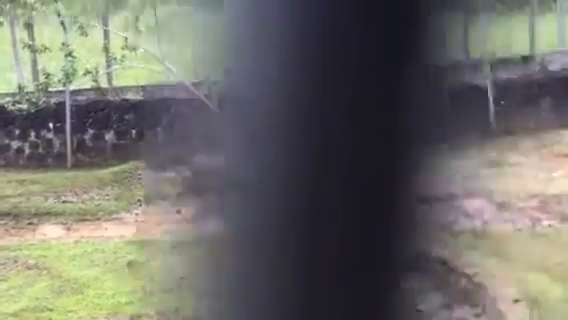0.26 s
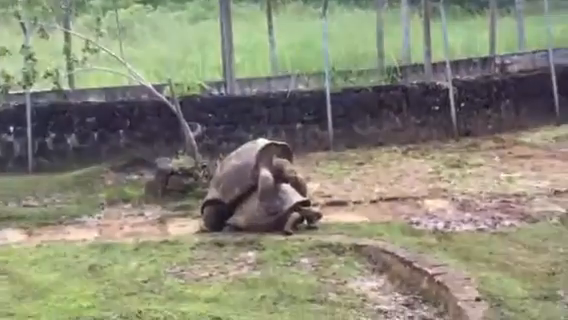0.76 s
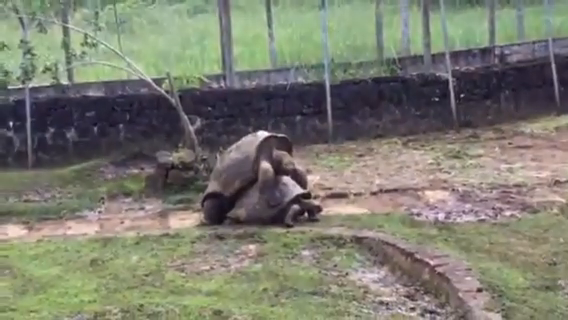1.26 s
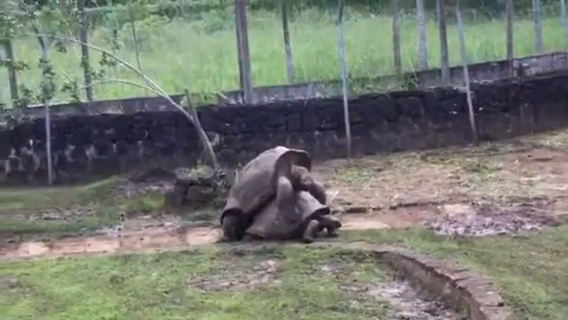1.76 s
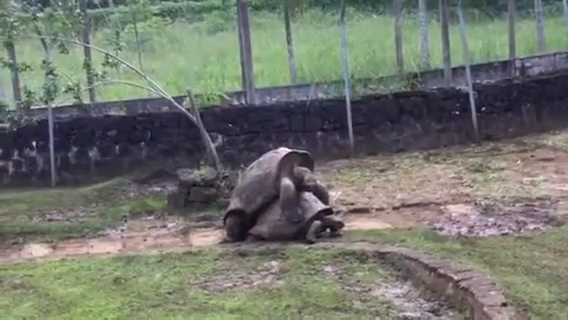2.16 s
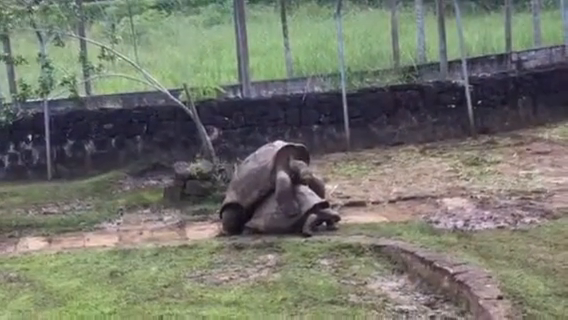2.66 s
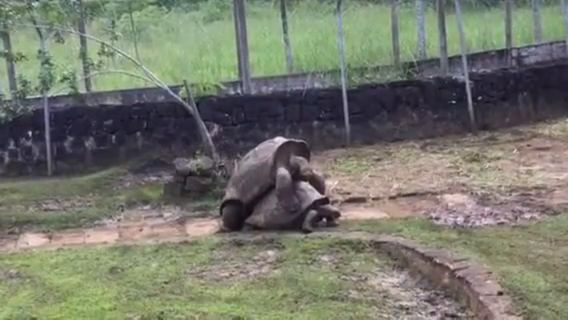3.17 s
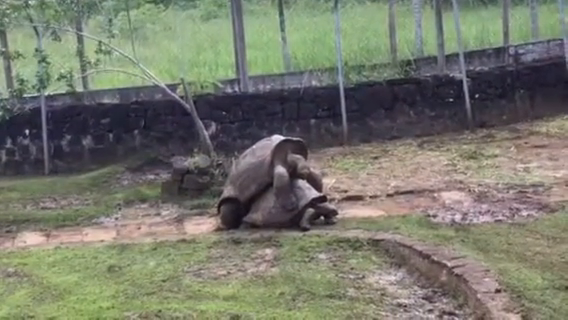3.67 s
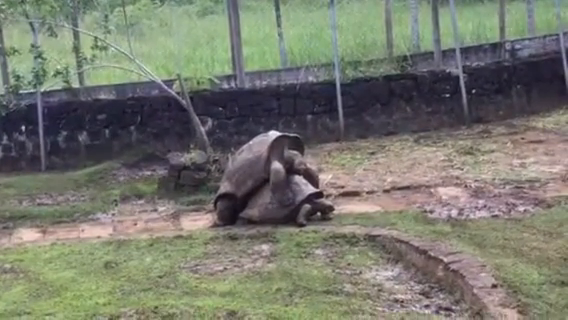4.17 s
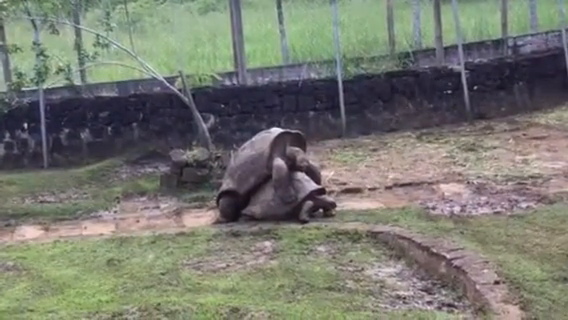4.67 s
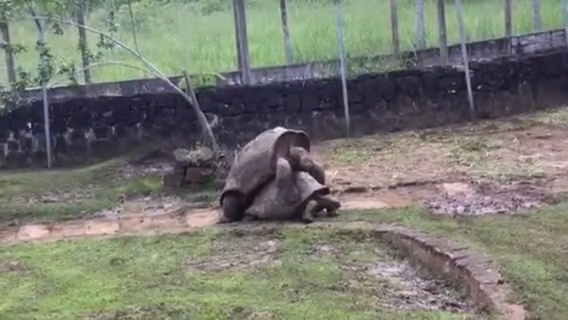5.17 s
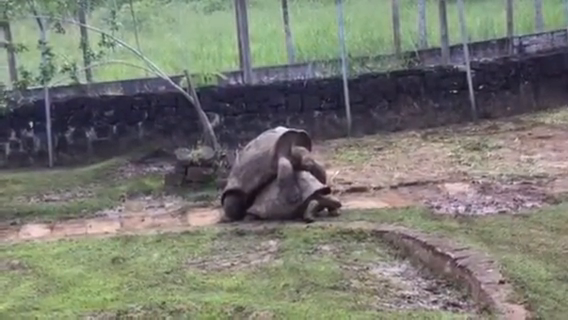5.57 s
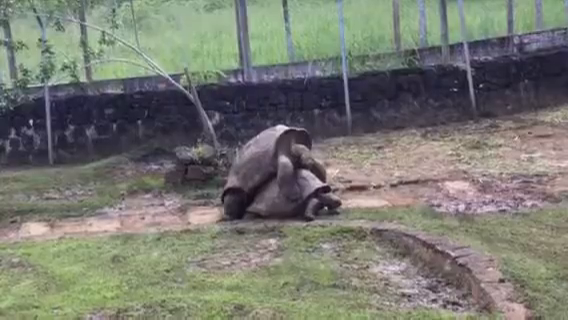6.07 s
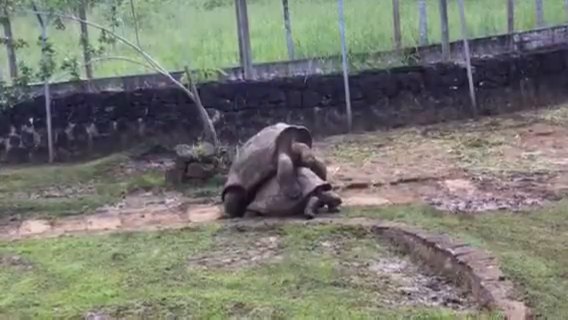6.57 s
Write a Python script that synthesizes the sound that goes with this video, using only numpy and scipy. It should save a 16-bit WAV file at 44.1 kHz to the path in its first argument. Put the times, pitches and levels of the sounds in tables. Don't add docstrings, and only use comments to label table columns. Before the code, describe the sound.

Quiet outdoor ambience with a distant low engine hum emerging from behind cover. Very early, the recorder is bumped, and a metal post is struck and dragged against. Then come sharp near bird calls, soft echoing warbles, rough chatter and thin insect hiss; a cicada's buzz stops partway. Light casing clicks cluster after two seconds, a strong one comes near five, and clear song closes the scene.

```python
import sys
import numpy as np
from scipy import signal
from scipy.fft import rfft, irfft
from scipy.io import wavfile

SR = 44100
rng = np.random.default_rng(int(sys.argv[2]) if len(sys.argv) > 2 else 0)


def ratio(d):
    e = np.asarray(d, float) / 20
    return 10 ** e


def wav_out(sig):
    wavfile.write(sys.argv[1], SR, np.round(np.clip(np.atleast_2d(sig).T, -1, 1) * 32767).astype(np.int16))


N = 300756

# f/Hz, level/dB
AIR_COLOUR = [(18, -39), (30, -27), (77, -1.5), (103, -6), (120, -3.5), (152, -12.5), (244, -22.5),
              (335, -24), (471, -78), (1090, -27.5), (1490, -41), (2730, -39.5), (4150, -44.5), (7200, -35),
              (15800, -55.5)]
# f/Hz, width/Hz, level/dB
INSECT_BANDS = [(6884, 930, 1.5), (7450, 600, -3.5), (8100, 840, -8.5), (5600, 1350, -8.5)]
# t/s, level/dB
INSECT_EFFORT = [(0, -64), (1.5, -60.5), (2.53, -60.5), (2.9, -75.5), (3.4, -68), (4.2, -65), (4.7, -69.5),
                 (5.15, -64), (5.5, -71), (6.82, -62.5)]
# t/s, lift/dB, half length/s
RUSTLES = [
    (2.5, 12, 0.3),
    (4.2, 9, .5),
    (5.15, 7, 0.34),
]
# t/s, level/dB, clicks/Hz
CICADA_EFFORT = [(0, -64, 162.5), (.8, -66.5, 164), (1.8, -62, 166), (2.5, -64, 169), (2.62, -75, 169.5),
                 (3.0, -76, 169), (6.82, -95, 169)]
# f/Hz, width/Hz, level/dB
CICADA_BODY = [(6550, 430, 0), (6970, 490, -1.5), (5330, 380, -10), (10470, 500, -17)]
# t/s, level/dB
FLOCK_EFFORT = [(0, -56.5), (.3, -76.5), (.9, -69.5), (2.6, -77), (2.85, -71), (3.5, -71), (4.2, -74.5),
                (5.9, -71), (6.82, -69.5)]
# start t/s, length/s, f/Hz, level/dB
HELD_NOTES = [(0, 0.19, 3046, -73), (.96, .05, 3140, -77), (1.53, 0.028, 2490, -68), (2.8, 0.08, 2655, -69),
              (3.129, 0.071, 3223, -69.5), (3.56, 0.038, 2860, -68), (3.612, 0.065, 2150, -69),
              (5.08, 0.03, 1725, -69.5), (5.293, 0.042, 2840, -74), (5.62, 0.07, 2690, -73),
              (5.623, 0.059, 1748, -75), (5.93, 0.071, 2707, -66.5), (6.028, 0.075, 2660, -67),
              (6.048, 0.058, 3410, -72), (6.164, 0.014, 2700, -59.5), (6.732, .08, 1756, -75)]
# start t/s, length/s, from f/Hz, to f/Hz, level/dB
BENT_NOTES = [(.82, 0.15, 3710, 3200, -70), (1.06, 0.088, 2850, 2380, -70), (2.33, 0.054, 2780, 2350, -71),
              (2.855, 0.045, 3410, 3040, -56.5), (2.89, 0.046, 2840, 2465, -59.5),
              (2.9, .06, 3120, 3370, -69), (3.3, 0.061, 4120, 3820, -67.5), (3.37, 0.03, 2670, 2070, -72),
              (3.535, 0.067, 2340, 2035, -69), (4.02, 0.057, 2360, 2100, -68),
              (5.24, 0.082, 2050, 2450, -67), (5.45, 0.1, 2990, 2725, -66), (5.7, 0.091, 2160, 2340, -67.5),
              (5.77, 0.026, 4050, 4100, -79)]
# start t/s, length/s, from f/Hz, to f/Hz, level/dB
SLIDES = [(2.695, 0.11, 2620, 2735, -63), (3.04, 0.033, 2650, 2400, -69), (4.83, 0.21, 5800, 2930, -75.5),
          (4.89, 0.059, 4310, 4010, -71), (5.0, 0.056, 5000, 3750, -71), (5.64, 0.056, 3900, 3540, -72.5),
          (6.14, 0.1, 2105, 2430, -72), (6.35, 0.055, 3800, 3450, -70), (6.385, 0.058, 2960, 2717, -69),
          (6.48, 0.14, 3100, 2670, -74), (1.285, 0.033, 5850, 4700, -63.5), (5.86, 0.077, 6620, 6530, -67)]
# start t/s, length/s, from f/Hz, to f/Hz, level/dB
CHIRPS = [(.745, 0.049, 6150, 6040, -70), (.803, 0.068, 5920, 4380, -61), (2.675, .075, 4600, 5750, -63),
          (2.745, .045, 5750, 4600, -68), (3.115, 0.033, 5500, 4400, -76), (3.255, .03, 6000, 5950, -74),
          (2.87, 0.033, 5400, 5380, -71), (3.72, 0.052, 4700, 4940, -73), (3.812, 0.1, 6170, 4660, -63.5),
          (4.64, 0.035, 5990, 6000, -67), (5.01, 0.028, 6270, 6520, -65), (5.265, .03, 5940, 5940, -70),
          (5.305, 0.036, 5850, 5630, -72), (5.81, 0.045, 6750, 6700, -66.5),
          (5.915, 0.063, 6400, 5190, -60.5)]
# start t/s, length/s, from f/Hz, to f/Hz, level/dB
NEAR_CALLS = [
    (1.683, .05, 7600, 6550, -51),
    (1.83, .04, 7500, 5900, -59),
    (1.89, .055, 5900, 5900, -61),
    (4.122, .04, 7200, 5940, -56),
    (4.178, .05, 7200, 5940, -58),
]
NEAR_OCTAVES = [-11, -12, -30, -26, -30]
# t/s, f/Hz, level/dB
PHRASES = [
    [(.225, 4600, -74), (.243, 3850, -69), (.28, 3870, -59.5), (.33, 3960, -87)],
    [(.085, 4270, -72), (.115, 4120, -68), (.15, 4200, -72)],
    [(.12, 3800, -74), (.17, 3840, -70), (.185, 3740, -74)],
    [(1.155, 3880, -76), (1.19, 3850, -76)],
    [(1.38, 3950, -75), (1.405, 4070, -73), (1.44, 4000, -78)],
    [(1.26, 3250, -68), (1.28, 3330, -68), (1.32, 3450, -68), (1.36, 3450, -69), (1.41, 3390, -71),
     (1.45, 3300, -74)],
    [(1.725, 4270, -74), (1.78, 4230, -64), (1.805, 4100, -77)],
    [(1.917, 5400, -66), (1.93, 4650, -56), (1.945, 4340, -66), (1.97, 4440, -64), (2.04, 4390, -75),
     (2.062, 3800, -67), (2.125, 3730, -65)],
    [(2.125, 3670, -72), (2.17, 3060, -67), (2.2, 3043, -63), (2.255, 3014, -75)],
    [(2.665, 4190, -74), (2.68, 4790, -68), (2.71, 5630, -59), (2.73, 5860, -63), (2.75, 5730, -62),
     (2.785, 5920, -62)],
    [(2.782, 2750, -59), (2.793, 3560, -59), (2.81, 3600, -64), (2.83, 3500, -70)],
    [(2.89, 3150, -62), (2.92, 3350, -65), (2.955, 3300, -66)],
    [(2.94, 3700, -61), (2.955, 3650, -62), (2.977, 3370, -61)],
    [(2.978, 3060, -59), (2.995, 3250, -55.5), (3.012, 3180, -57), (3.03, 2860, -61)],
    [(3.15, 4150, -62), (3.185, 4580, -68), (3.21, 4800, -71), (3.25, 4360, -64)],
    [(4.315, 2670, -57), (4.37, 2320, -78), (4.41, 2600, -64.5), (4.47, 2665, -58), (4.5, 2700, -77),
     (4.55, 2750, -76)],
]
# t/s, f/Hz, level/dB
LAST_PHRASES = [
    [(6.397, 3980, -68), (6.405, 4600, -58), (6.415, 5150, -67), (6.45, 5000, -69), (6.48, 4900, -60)],
    [(6.405, 5950, -62), (6.43, 5940, -64), (6.46, 5600, -65), (6.495, 5700, -67)],
    [(6.505, 4560, -65), (6.525, 4050, -69), (6.56, 4250, -72)],
    [(6.595, 4650, -63), (6.64, 4400, -69), (6.67, 4150, -61), (6.69, 3900, -65)],
    [(6.75, 3090, -70), (6.77, 2770, -72), (6.8, 2670, -70)],
    [(6.775, 5000, -72), (6.795, 4600, -67), (6.82, 4650, -62)],
]
# start t/s, length/s, from f/Hz, to f/Hz, level/dB
CHATTER_NOTES = [(4.135, 0.102, 6000, 5950, -63.5), (4.7, 0.088, 5950, 5950, -67),
                 (1.6, 0.029, 6500, 5900, -60), (5.675, 0.039, 2700, 3200, -67),
                 (2.88, 0.082, 3100, 4000, -69), (3.1, .04, 3900, 3600, -69), (3.0, 0.097, 3750, 3550, -71),
                 (5.44, 0.037, 3900, 3500, -64), (5.49, .09, 3550, 3350, -68.5),
                 (6.2, 0.056, 3000, 3600, -80), (5.695, 0.059, 2900, 3300, -61),
                 (5.76, .05, 3100, 2950, -66.5), (5.75, 0.033, 3100, 4100, -60.5),
                 (5.802, 0.089, 3000, 4200, -71), (5.8, 0.056, 3300, 2700, -66),
                 (5.905, 0.056, 3800, 3500, -65), (6.206, 0.046, 2850, 2540, -58.5),
                 (6.248, 0.047, 2700, 2250, -65), (2.796, 0.076, 3200, 3600, -72),
                 (3.031, 0.088, 3300, 3100, -71), (2.96, 0.088, 4050, 3900, -69.5),
                 (4.84, .12, 5500, 3900, -70), (3.4, 0.28, 3500, 3500, -76), (2.7, .07, 5000, 5400, -67.5),
                 (2.755, .08, 5400, 5100, -67), (2.4, .075, 4900, 4600, -71), (2.8, 0.062, 3800, 3400, -70),
                 (2.8, .04, 5700, 5650, -71), (5.42, .04, 5400, 4200, -72), (5.55, .045, 2900, 2800, -67),
                 (6.2, 0.066, 3250, 3150, -68), (6.4, .04, 3500, 2900, -70)]
# start t/s, end t/s, level/dB, low edge f/Hz, high edge f/Hz
BRUSHES = [(0, 0.197, -51.5, 303, 854), (0.226, .3, -55, 402, 620), (.365, .405, -49, 603, 1440),
           (0.366, 0.375, -58, 4000, 14000), (.82, .88, -80, 9000, 15500), (1.535, 1.77, -60.5, 900, 3280),
           (2.253, 2.266, -60, 3400, 5000), (2.252, 2.265, -58, 8500, 12500),
           (2.277, 2.332, -61.5, 2300, 3630), (2.41, 2.44, -64, 1800, 3600),
           (2.472, 2.52, -69, 8000, 15500), (2.492, 2.51, -61.5, 2500, 3600),
           (2.76, 2.98, -72, 9000, 15500), (6.385, 6.43, -62, 6000, 15000),
           (6.398, 6.41, -51.5, 4000, 14500)]
# t/s, peak
# level/dB, f/Hz, time to fall 60 dB/s
BUMPS = [(0.211, -30.5, 122.5, 0.16), (0.443, -34, 128, 0.16), (0.505, -26.5, 540, 0.022),
         (0.508, -35, 221, 0.051), (0.538, -27.5, 99, 0.067), (.25, -44, 199, 0.14), (.33, -42, 207, 0.12),
         (.615, -36.5, 871, 0.12), (.675, -42, 880, 0.18), (2.253, -46.5, 1210, .03),
         (2.2535, -46, 9200, .03)]
# t/s, peak level/dB, low body against the snap/dB
TICKS = [
    (0.8494, -62, 8),
    (2.1126, -56, 4),
    (2.2525, -53, 0),
    (2.4169, -50, 2),
    (2.4708, -50, -1),
    (2.4898, -53, -6),
    (2.9133, -55, -12),
    (4.8188, -28.5, 0.5),
    (6.3874, -62, -5),
    (6.398, -50, -6),
]
# t/s, peak level/dB
CRACKLES = [(2.3044, -63), (2.3224, -60), (2.3705, -55), (2.3895, -60), (2.3944, -58), (2.4044, -63),
            (2.4134, -62), (2.4844, -62), (2.572, -64), (2.5964, -64), (2.609, -61), (1.455, -66)]
# f/Hz, level/dB, time to fall 60 dB/s
CASING_MODES = [(5200, 0, .003), (6400, -4, .003), (9200, 2, .0026), (10500, -1, .0026), (14500, -12, .002)]
# f/Hz, level/dB, time to fall 60 dB/s
POST_MODES = [(415, -9, 0.23), (540, -7, 0.15), (741, 1, 0.09), (850, -4, 0.09), (1078, 6, 0.046),
              (1323, 0.5, 0.044), (1500, -4, 0.041), (3020, -8, 0.086), (3250, 1.5, 0.1), (3830, -13, .07),
              (6100, 4.5, .05), (9410, 4, .06), (13100, 0, .08), (14200, -6, .14)]
# t/s, strength/dB, hardness f/Hz
KNOCKS = [
    (0.3637, -36.5, 3050),
    (1.536, -56, 3000),
]
# t/s, level/dB
SCRAPE = [(.362, -48), (.42, -52), (.52, -52), (.59, -45), (.618, -41), (.652, -47.5), (.678, -46),
          (.705, -56.5), (.78, -68)]
# f/Hz, level/dB
SCRAPE_COLOUR = [(180, -53), (340, -22), (411, -4.5), (785, -13.5), (825, -4), (1230, -12), (2100, -13),
                 (3500, -6.5), (5700, -18.5), (8800, -15), (14300, -17), (15900, -22)]
# t/s, f/Hz
ENGINE_PITCH = [(0, 92), (.7, 88.5), (1.5, 91.5), (2.5, 94.5), (3.2, 96), (4, 98), (5.2, 99), (5.8, 100.5),
                (6.05, 105), (6.4, 102), (6.82, 101)]
# t/s, level/dB
ENGINE_LEVEL = [(0, -48.5), (.15, -62), (.55, -54), (.81, -38.5), (1.0, -45), (1.64, -34.5), (1.9, -38),
                (2.6, -38), (3.0, -41), (3.6, -37.5), (4.2, -43.5), (4.55, -42.5), (4.66, -38.5),
                (5.16, -36), (5.45, -39), (5.9, -41.5), (6.15, -48.5), (6.82, -40)]
# t/s, depth/dB, half length/s
FADES = [(.43, -13, 0.048), (1.84, -4, 0.07), (2.0, -8.5, 0.09), (2.23, -8.5, 0.074), (2.46, -7.5, 0.14),
         (2.69, -5.5, .04), (2.83, -17.5, 0.12), (3.18, -4, 0.048), (3.44, -10, 0.15), (3.82, -5, 0.076),
         (4.05, -2.5, 0.044), (4.15, -7, 0.038), (4.42, -5.5, 0.1), (4.8, -7, 0.08), (5.21, -4.5, 0.058),
         (5.77, -5.5, 0.19), (5.97, -8, 0.04), (6.18, -4, 0.079), (6.35, -14, 0.05), (6.56, -12, 0.1),
         (6.82, -24, 0.1)]
# t/s, lift/dB, half length/s
DOUBLE_SPELLS = [
    (.37, 11, 0.28),
    (1.8, 16, 1.44),
    (4.9, 12.5, 1.1),
    (6.2, 13.5, 0.77),
]
# t/s, lift/dB, half length/s
GUSTS = [
    (.7, 4, 0.96),
    (4.1, -5, 0.23),
    (5.0, 7, 0.71),
    (6.1, 9, 0.61),
]
# f/Hz, level/dB
WHINE = (394, -69.5)

COVER_DB, COVER_S = -25, 0.21


def unit(x):
    return x / np.sqrt(np.mean(x ** 2) + 1e-20)


def in_time(rows):
    s, *columns = np.transpose(rows)
    return [np.interp(np.arange(N) / SR, s, c) for c in columns]


def spells(rows):
    t = np.arange(N) / SR
    return sum(db * np.clip(1 - abs(t - s) / half, 0, 1) for s, db, half in rows)


def drift(rate):
    r = np.exp(-80 * np.pi * rate / SR)
    slow = signal.lfilter([1], [1, -2 * r, r * r], rng.standard_normal(N // 40 + 2002))[2000:]
    return np.interp(np.arange(N) / 40, np.arange(len(slow)), unit(slow - slow.mean()))


def band(x, low_hz, high_hz):
    edges = [low_hz, min(high_hz, .45 * SR)]
    return signal.sosfilt(signal.butter(2, edges, "band", fs=SR, output="sos"), x)


def narrow(hz, width):
    low_hz, high_hz = hz - width / 2, hz + width / 2
    return unit(band(band(rng.standard_normal(N), low_hz, high_hz), low_hz, high_hz))


def coloured(x, spectrum):
    hz, db = np.transpose(spectrum)
    grid = np.maximum(np.arange(N // 2 + 1) * SR / N, 1)
    return unit(irfft(rfft(x) * ratio(np.interp(np.log(grid), np.log(hz), db)), N))


def ring(x, hz, t60):
    r, w = ratio(-60 / (t60 * SR)), 2 * np.pi * hz / SR
    return signal.lfilter([0, np.sin(w)], [1, -2 * r * np.cos(w), r * r], x + 1e-18)


def air():
    insects_db, = in_time(INSECT_EFFORT)
    rustle_db = -76.5 + spells(RUSTLES)
    wash_db = -59.5 - .5 * np.arange(N) / SR + spells([(0.014, COVER_DB, COVER_S)])
    floor = band(coloured(rng.standard_normal(N), AIR_COLOUR), 29, 13400)
    floor *= ratio(-55.5 + 4.0 + .5 * drift(1.3))
    chorus = sum(ratio(db + 1.4 * drift(2.3) + 0.88 * drift(11)) * narrow(hz, width)
                 for hz, width, db in INSECT_BANDS)
    grains = rng.standard_normal(N) * ratio(5.1 * drift(40))
    rustle = ratio(rustle_db - 5.0) * unit(band(grains, 6100, 9700))
    wash = ratio(wash_db - 2.0 + 1.54 * drift(12.5)) * unit(band(rng.standard_normal(N), 244, 1290))
    return floor + ratio(insects_db + 0.5) * unit(chorus) + rustle + wash


def cicada():
    level_db, rate = in_time(CICADA_EFFORT)
    turn = 2 * np.pi * np.cumsum(rate * (1 + .02 * drift(20))) / SR
    gate = 1 + .55 * np.cos(turn)
    body = sum(ratio(db) * narrow(hz, width) for hz, width, db in CICADA_BODY)
    return ratio(level_db + 1.2 * drift(4)) * unit(gate ** 2 * body)


def trees(x, direct_db, t60, flutter_db=5.5):
    lag = np.arange(SR // 2) / SR
    tail = rng.standard_normal(len(lag)) * ratio(-60 * lag / t60) * (lag > .004)
    x = x * ratio(flutter_db * (drift(50) + drift(150)))
    return ratio(direct_db) * x + signal.fftconvolve(x, unit(tail) / np.sqrt(len(lag)))[:N]


def whistle(contours, octave_db):
    out = np.zeros(N + SR)
    quaver = np.pad(drift(60) + drift(14), (0, SR))
    for contour, db_up in zip(contours, octave_db):
        s, hz, db = np.transpose(contour)
        at = np.arange(int(s[0] * SR), int(s[-1] * SR))
        pitch_hz = np.interp(at / SR, s, hz) * (1 + .006 * quaver[at])
        turn = 2 * np.pi * np.cumsum(pitch_hz) / SR
        shape = ratio(np.interp(at / SR, s, db) + 5.5) * signal.windows.tukey(len(at), .08)
        out[at] += shape * (np.sin(turn) + ratio(db_up) * np.sin(2 * turn))
    return out[:N]


def swoops(rows, bend, rise_db, fall_db):
    share = np.clip(bend, .05, .95)
    contours = []
    for s, length, from_hz, to_hz, db in rows:
        middle_hz = from_hz + 0.61 * (to_hz - from_hz)
        contours.append([(s, from_hz, db + rise_db),
                         (s + share * length / 2, middle_hz, db + rise_db / 2),
                         (s + share * length, to_hz, db),
                         (s + length, to_hz, db + fall_db)])
    return contours


def flock(count):
    contours = []
    for s, length, pitch, glide, size in rng.random((count, 5)):
        start, hz = s * N / SR, 2100 * 2.4 ** pitch
        end, db = start + .03 + .09 * length, 3.0 * size
        contours.append([(start, hz * (.85 + .45 * glide), db + 0.5),
                         ((start + end) / 2, hz, db),
                         (end, hz * .97, db)])
    return unit(trees(whistle(contours, [-60] * count), direct_db=-13, t60=.5, flutter_db=1.5))


def chatter():
    trill_hz, swing_hz = 95, 140
    out = np.zeros(N)
    shake = np.cumsum(trill_hz * (1 + .25 * drift(30))) * 2 * np.pi / SR
    for s, length, from_hz, to_hz, db in CHATTER_NOTES:
        at = np.arange(int(s * SR), int((s + length) * SR))
        hz = np.linspace(from_hz, to_hz, len(at)) + swing_hz * np.sin(shake[at])
        pulse = (1 + .7 * np.cos(shake[at])) * signal.windows.tukey(len(at), .4)
        out[at] += ratio(db + 2.5) * pulse * np.sin(2 * np.pi * np.cumsum(hz) / SR)
    return trees(out, direct_db=1, t60=.3, flutter_db=2)


def birds():
    low = swoops([(s, length, hz, hz, db) for s, length, hz, db in HELD_NOTES], bend=0.67, rise_db=0, fall_db=-5.0)
    low += swoops(BENT_NOTES, bend=0.606, rise_db=-6.0, fall_db=-25)
    low += swoops(SLIDES, bend=0.73, rise_db=1.0, fall_db=-22)
    high = swoops(CHIRPS, bend=.6, rise_db=0, fall_db=-14)
    calls = swoops(NEAR_CALLS, bend=.36, rise_db=3, fall_db=-12)
    warbles = trees(whistle(low, [-40] * len(low)), direct_db=2.5, t60=.21, flutter_db=2.6)
    chirps = trees(whistle(high, [-30] * len(high)), direct_db=0, t60=.3, flutter_db=2.5)
    near = trees(whistle(calls, NEAR_OCTAVES), direct_db=8, t60=.28, flutter_db=1)
    clear = trees(whistle(PHRASES + LAST_PHRASES, [-40] * 30), direct_db=3.5, t60=.3, flutter_db=.9)
    out = ratio(-3.0) * warbles + ratio(-2.5) * chirps + ratio(-10) * near + ratio(-7.0) * clear
    return out + ratio(-3.5) * chatter() + ratio(in_time(FLOCK_EFFORT)[0]) * flock(count=800)


def handling():
    out, sample = np.zeros(N), np.arange(N)
    for start, end, db, low_hz, high_hz in BRUSHES:
        at = np.arange(int(start * SR), int(end * SR))
        corners = [at[0], at[0] + 40, at[-1] - len(at) // 5, at[-1]]
        shape = np.interp(at, corners, [1.0, 0.93, 0.38, 0.18])
        noise = unit(band(rng.standard_normal(len(at)), low_hz, high_hz))
        out[at] += ratio(db + 2.4 * drift(34)[at]) * shape * noise
    for s, db, hz, t60 in BUMPS:
        click = 1.0 * (sample == int(s * SR))
        soft = ring(ring(click, hz, t60), hz, t60 / 3)
        out += ratio(db) * soft * 30 / (t60 * SR)
    return out


def ticks():
    out, lag = np.zeros(N), np.arange(1320) / SR
    late, later = np.maximum(lag - .0004, 0), np.maximum(lag - .002, 0)
    thump = -np.sin(2 * np.pi * 860 * late) * late / 0.00035 * ratio(-60 * late / 0.0025)
    knock = np.sin(2 * np.pi * 2000 * lag) * ratio(-18.0 - 60 * lag / 0.0066)
    hollow = -np.sin(2 * np.pi * 560 * later) * later / 0.0027 * ratio(-22.0 - 60 * later / 0.019)
    body = thump + knock + hollow
    for (s, db, body_db), spread in zip(TICKS, rng.standard_normal((len(TICKS), len(CASING_MODES)))):
        snap = sum(ratio(mode_db + 2.2 * z - 60 * lag / t60) * np.sin(2 * np.pi * hz * lag)
                   for (hz, mode_db, t60), z in zip(CASING_MODES, spread))
        snap = band(snap, 4200, 12500)
        at = int((s + .0014) * SR)
        out[at:at + 1320] += ratio(db + 4.0) * (-snap / abs(snap).max() + ratio(body_db + 5.0) * body)
    for (s, db), burst in zip(CRACKLES, rng.standard_normal((len(CRACKLES), 1320))):
        snap = band(burst * ratio(-60 * lag / .006), 8500, 14500)
        out[int(s * SR):int(s * SR) + 1320] += ratio(db) * snap / abs(snap).max()
    return out


def post():
    before, after = (SCRAPE[0][0] - .002, -120), (SCRAPE[-1][0] + .03, -120)
    level_db, = in_time([before] + SCRAPE + [after])
    slips = ratio(level_db) * rng.standard_normal(N) * ratio(2.0 * drift(90))
    blows, lag = np.zeros(N), np.arange(400) / SR
    for s, db, hardness_hz in KNOCKS:
        push = lag * np.exp(-2 * np.pi * hardness_hz * lag)
        blows[int(s * SR):int(s * SR) + 400] -= ratio(db) * push / push.sum()
    force = blows + ratio(-37.5) * band(slips, 300, 3700)
    modes = sum(ratio(db) * ring(force, hz, t60) for hz, db, t60 in POST_MODES)
    crack = ratio(18.5) * band(blows, 500, 14000)
    rub = coloured(rng.standard_normal(N), SCRAPE_COLOUR)
    hz = np.arange(N // 2 + 1) * SR / N
    grit = irfft(rfft(rub) * np.clip((hz - 9500) / 3000, 0, 1), N)
    rub -= grit * np.interp(np.arange(N) / SR, [.51, .545, .68, .705], [.62, 0, 0, .8])
    return modes + crack + ratio(level_db + 1.0 + 1.1 * drift(150) + 1.2 * drift(40)) * rub


def engine():
    t = np.arange(N) / SR
    (pitch_hz,), (level_db,) = in_time(ENGINE_PITCH), in_time(ENGINE_LEVEL)
    level_db = level_db + spells(FADES)
    cover_db = spells([(0.01, COVER_DB, COVER_S)])
    half_db = -54 - 25 * np.clip(4 * (t - 4.33), 0, 1) + cover_db
    body_db = -57.5 - t + cover_db
    double_db = -70.5 + spells(DOUBLE_SPELLS)
    rumble_db = -55.5 + spells(GUSTS) + cover_db
    turn = 2 * np.pi * np.cumsum(pitch_hz) / SR
    out = ratio(level_db + 2.5 + .7 * drift(6)) * np.sin(turn + 0.15 * drift(14.0))
    turn = 2 * np.pi * np.cumsum(np.minimum(pitch_hz, 100.3)) / SR
    out += ratio(half_db + 2.5 * drift(3)) * np.sin(3 * turn / 2 + 0.33 * drift(4))
    out += ratio(double_db - 1.0 + 3.2 * drift(10.0)) * np.sin(2 * turn + 0.7 * drift(1.8))
    out += ratio(rumble_db - 2.5) * unit(band(rng.standard_normal(N), 49.8, 73.0))
    out += ratio(body_db) * unit(band(rng.standard_normal(N), 100.0, 198.0))
    whine_hz, whine_db = WHINE
    return out + ratio(whine_db + 2 * drift(4.5)) * np.sin(2 * np.pi * whine_hz * t + drift(4.4))


def scene():
    return (air() + cicada() + birds() + handling() + ticks() + post() + engine())[None]


def low_pass(x):
    return signal.sosfilt(signal.butter(12, 16370, fs=SR, output="sos"), x)


def record(dry):
    x = signal.sosfilt(signal.butter(4, 36, "high", fs=SR, output="sos"), dry)
    mix = signal.sosfilt(signal.ellip(9, .3, 55, 15760, fs=SR, output="sos"), x)
    return low_pass(mix)


dry = scene()
out = record(dry)
wav_out(out)
```